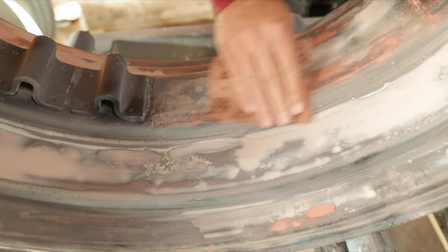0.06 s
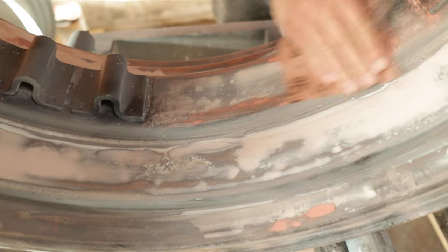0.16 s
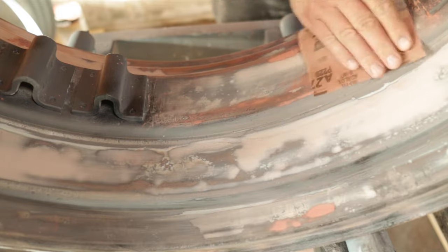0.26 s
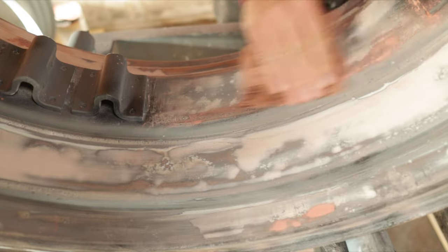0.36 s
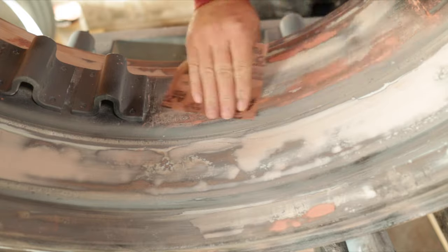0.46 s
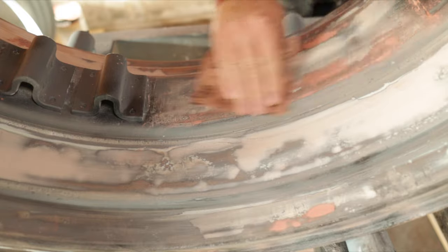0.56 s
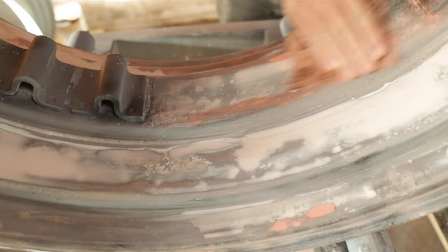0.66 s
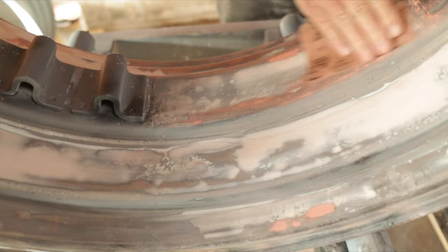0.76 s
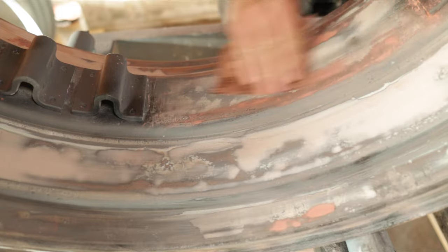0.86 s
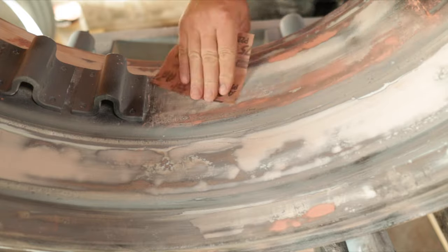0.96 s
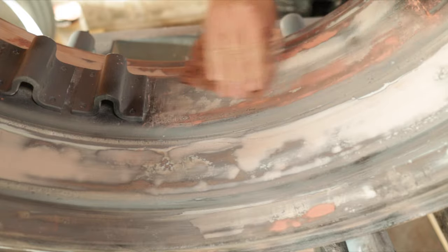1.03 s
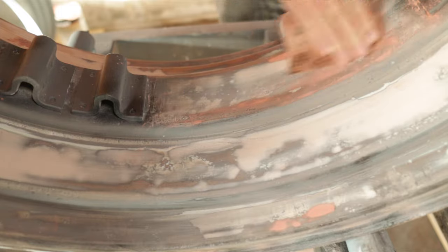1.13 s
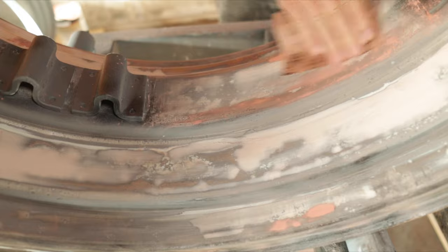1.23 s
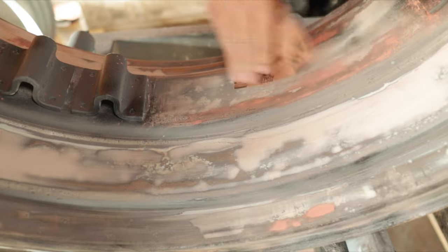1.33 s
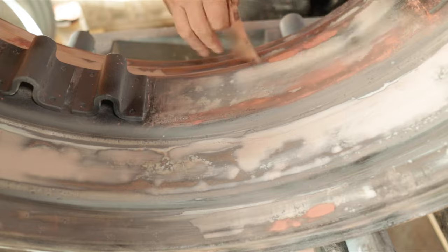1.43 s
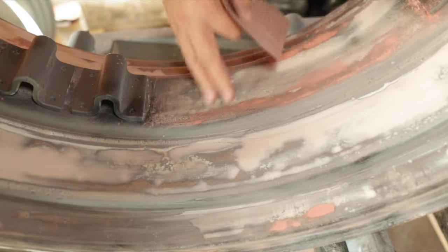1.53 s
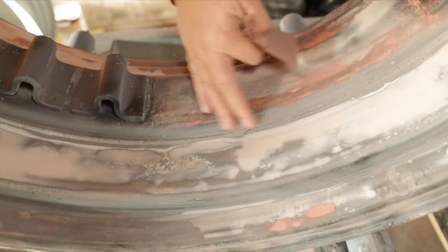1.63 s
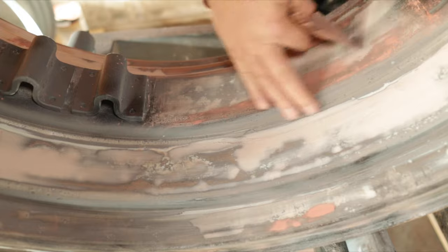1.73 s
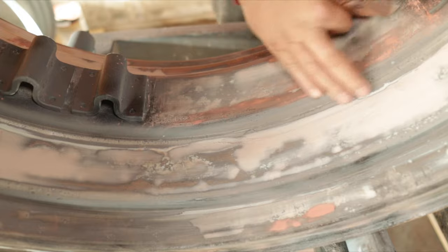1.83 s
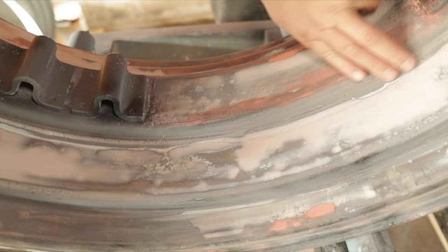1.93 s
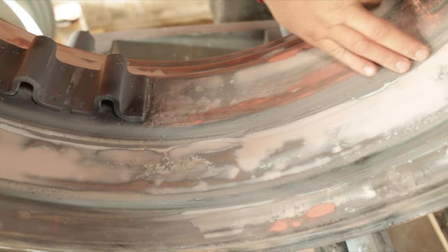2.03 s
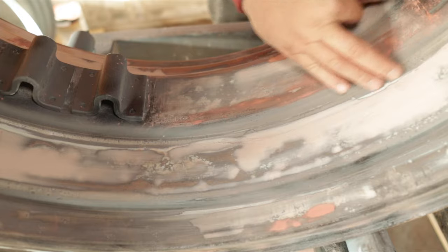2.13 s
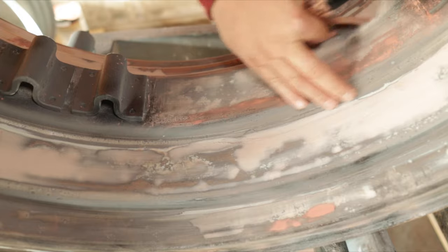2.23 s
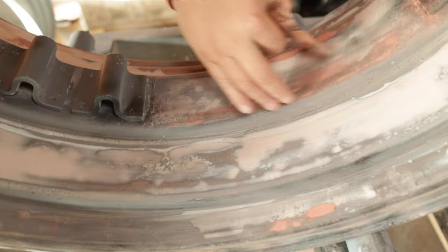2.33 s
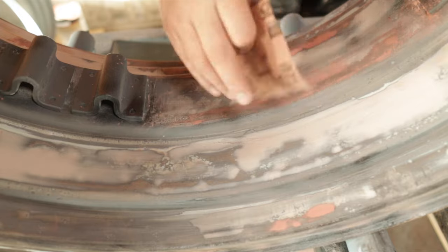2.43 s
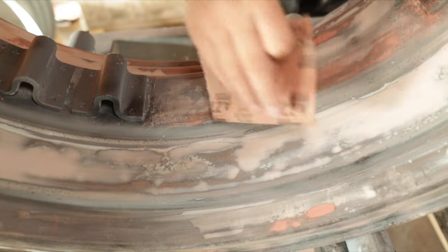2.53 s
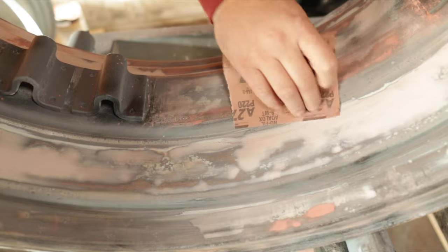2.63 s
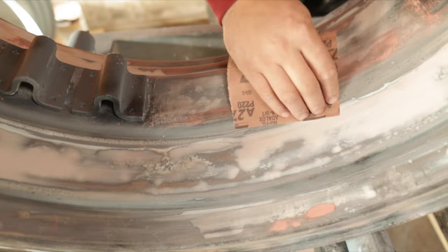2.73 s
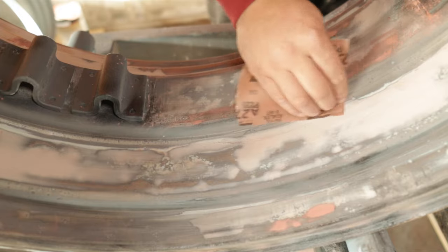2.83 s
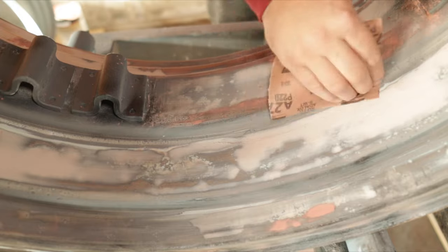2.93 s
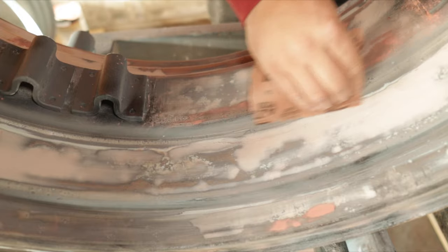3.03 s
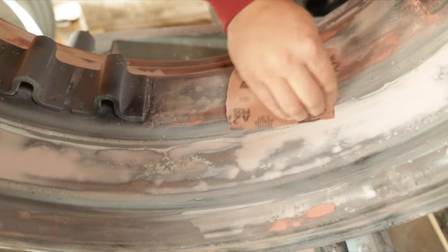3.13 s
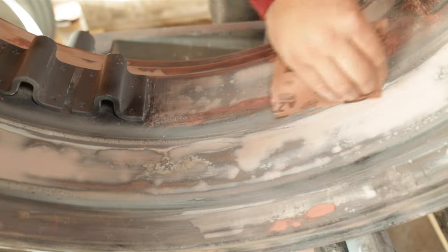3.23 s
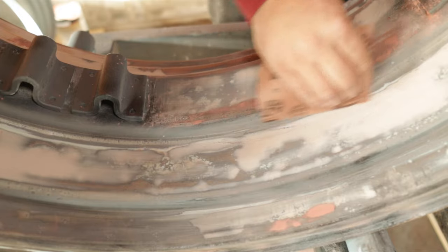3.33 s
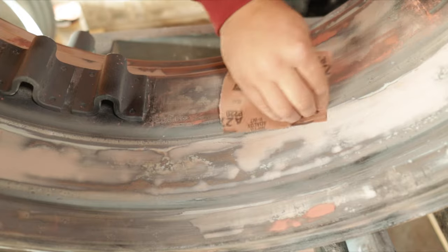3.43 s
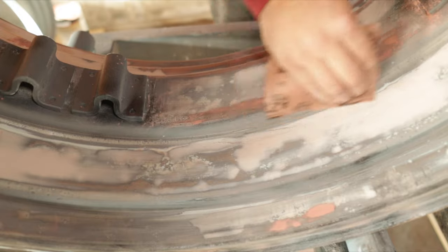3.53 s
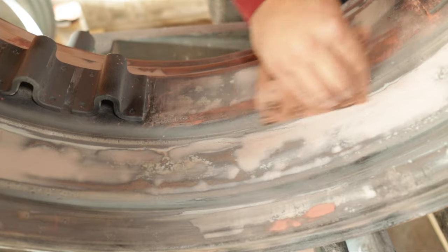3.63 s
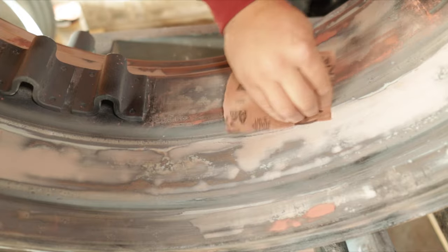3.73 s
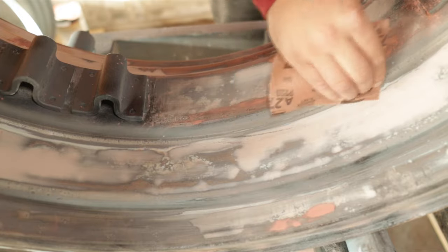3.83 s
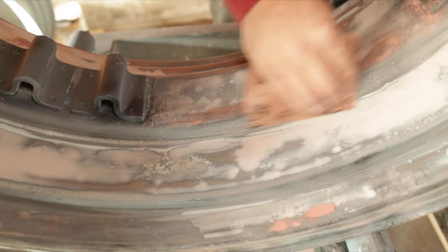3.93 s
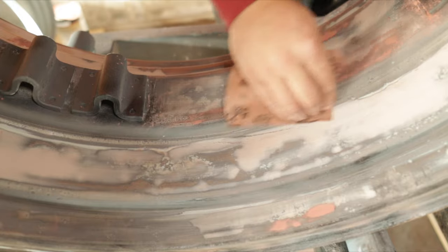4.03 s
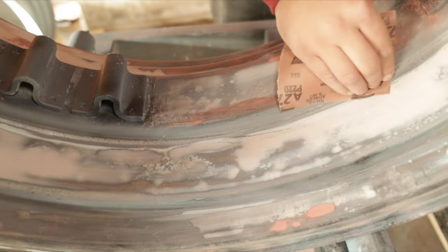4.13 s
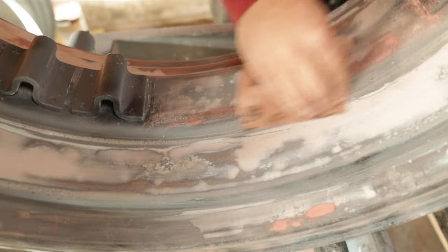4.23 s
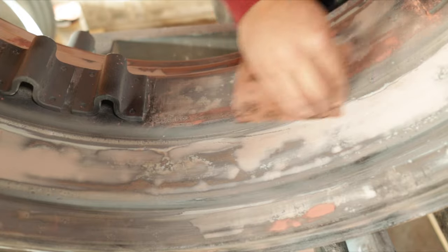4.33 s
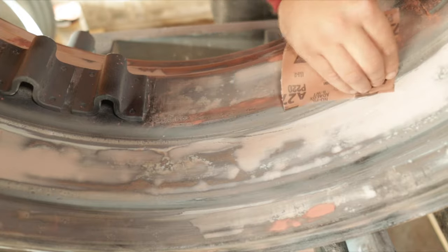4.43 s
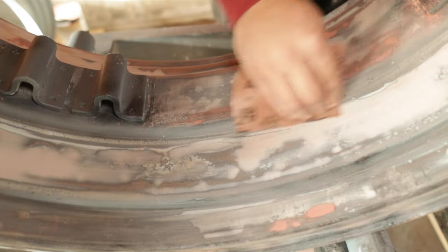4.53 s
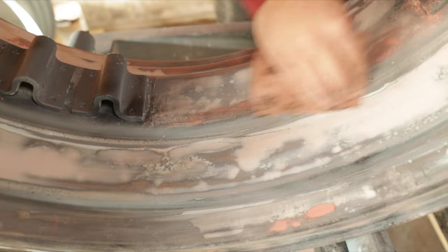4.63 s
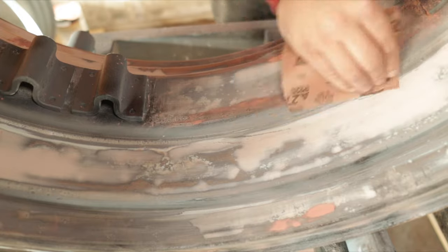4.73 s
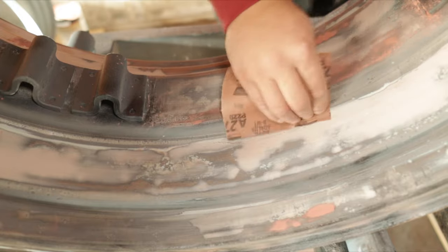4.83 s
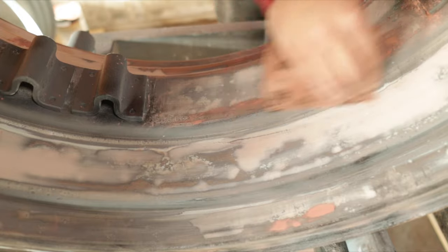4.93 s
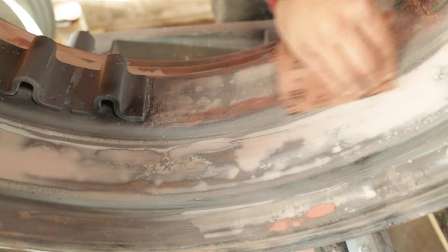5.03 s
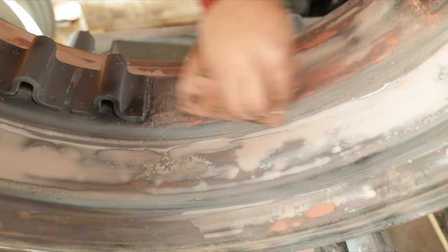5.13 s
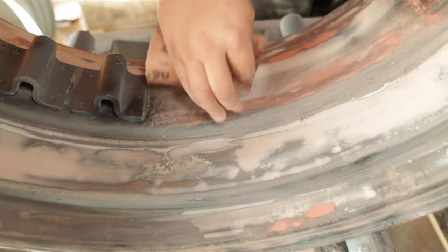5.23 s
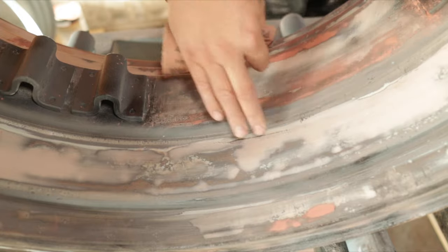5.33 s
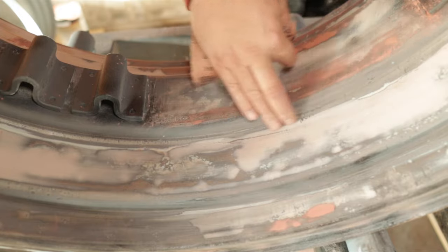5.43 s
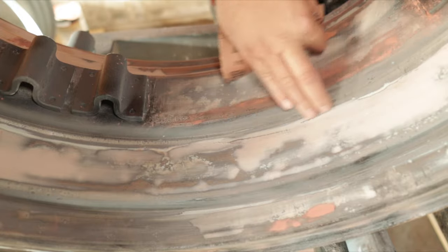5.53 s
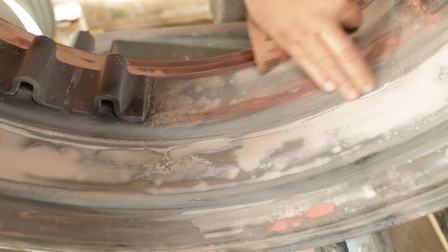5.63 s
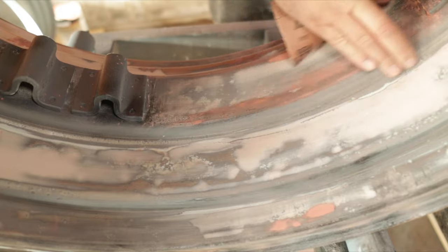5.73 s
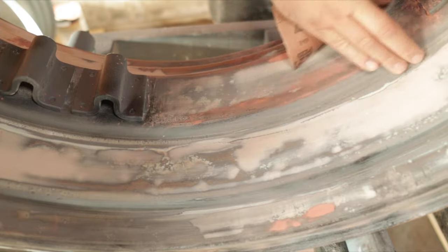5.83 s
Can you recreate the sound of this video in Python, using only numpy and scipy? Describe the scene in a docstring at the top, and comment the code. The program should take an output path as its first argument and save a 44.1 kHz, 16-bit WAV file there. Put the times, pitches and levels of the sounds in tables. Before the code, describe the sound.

Close, dry sandpaper hiss sweeps to and fro over a steel wheel rim, about four long strokes a second. It stops; fingers brush faintly and tap, with sharp knocks on hollow metal. Then short, hard strokes scrub nearly twice as fast, with more metallic scrape, until they end and near-quiet returns. A low workshop rumble and soft echo sit behind. One close microphone, centred.

```python
"""Sandpaper is rubbed by hand to and fro over a primed steel wheel rim: long light strokes, then short hard ones.
Its grit is random tiny clicks, heard as hiss and also shaking the rim, whose modes are ringing filters.
Between the spells fingers wipe (faint grit) and tap (a push, a crack and ringing) as the paper is laid down again.
A knock leaves the wheel humming as two beating modes; shaped noise makes the workshop's rumble and echo.
One microphone hears it all, both channels alike."""
import sys
import numpy as np
from scipy import signal
from scipy.fft import rfft, irfft
from scipy.io import wavfile

SR = 44100
rng = np.random.default_rng(int(sys.argv[2]) if len(sys.argv) > 2 else 0)


def store_pcm(level_fs):
    """Save levels as 16-bit WAV."""
    pcm = np.round(np.clip(level_fs, -1, 1) * 32767).astype(np.int16)
    wavfile.write(sys.argv[1], SR, np.atleast_2d(pcm).T)


def ratio_of_db(decibels):
    """Turn decibels (scalar or array-like) into linear amplitude factors; 0 dB maps to 1."""
    return 10 ** (np.asarray(decibels, float) / 20)


N = 258867   # length in samples

# Strokes of the paper. Each row: start in seconds, end in seconds, hiss level in dB,
# swell over the stroke in dB, ring of the rim's cavity in dB against the hiss.
PAPER_STROKES = [(-0.05, 0.057, -20.5, 0, -3.5), (0.061, 0.365, -16, 5.5, -7), (0.367, 0.618, -15, 4, -7.5),
                 (0.621, 0.866, -16, 0.5, -8.5), (0.839, 1.112, -18, -0.5, -9),
                 (1.076, 1.315, -21, 5.5, -6.5), (1.304, 1.462, -18.5, 7.5, -7.5),
                 (2.923, 3.055, -17, 10, -1.5), (3.092, 3.235, -16.5, 2.5, 2.5),
                 (3.257, 3.383, -16.5, 1.5, -1.5), (3.395, 3.548, -16.5, 2, -0.5),
                 (3.563, 3.693, -17.5, 5.5, -2), (3.705, 3.841, -17, 4, 2.5),
                 (3.858, 3.978, -18.5, 1.5, -2), (3.985, 4.129, -17.5, 3, 1),
                 (4.136, 4.265, -18.5, 0.5, -1), (4.269, 4.412, -17.5, 9, -0.5),
                 (4.419, 4.549, -18.5, 3, -1), (4.551, 4.692, -18, 11, -1.5), (4.707, 4.83, -17.5, 0, -3.5),
                 (4.836, 4.976, -17, 7, -3), (4.992, 5.122, -17.5, 1.5, -3.5), (5.117, 5.301, -19, -4, -5)]
# Fingers and loose paper brushing the rim. Each row: start in seconds, end in seconds, hiss level in dB,
# cavity ring in dB against the hiss, rim body in dB against the hiss.
FINGER_WIPES = [(1.463, 1.54, -26.5, 1.5, -6), (1.67, 1.84, -44.5, 10, 10.5), (1.786, 1.86, -33.5, 3, -20),
                (1.779, 1.98, -38.5, 6.5, 4.5), (1.936, 2, -33.5, -10, -20), (1.97, 2.22, -39.5, 5, 1),
                (2.006, 2.036, -29, -3, -22), (2.05, 2.125, -37.5, 6, 3), (2.13, 2.254, -42.5, 5.5, 1),
                (2.173, 2.19, -32, 0, -20), (2.18, 3.06, -48, -14, -12), (2.46, 2.628, -42.5, 11.5, -9),
                (2.704, 2.78, -28.5, 6, 3), (2.761, 3.1, -51, 9, 20), (2.822, 3.7, -41, -8, -20),
                (2.904, 3.026, -39, 15, 24.5), (5.26, 5.54, -48, -11, 4.5), (5.47, 6.3, -48, -13.5, -31)]
# Fingers and paper edge touching down. Each row: time in seconds, level in dB, centre frequency in Hz.
TOUCHES = [(1.438, -7, 436), (1.45, -5, 440), (1.468, -4.5, 2310), (1.479, -10, 360), (1.687, -17.5, 630),
           (1.699, -23, 700), (1.712, -20.5, 690), (1.789, -16, 2200), (1.92, 1, 696), (1.938, -9, 420),
           (1.943, -20, 345), (1.982, -3.5, 931), (1.995, -14, 930), (2.007, -11.5, 590), (2.066, -16, 931),
           (2.082, -16, 675), (2.099, -17, 617), (2.139, -28, 548), (2.176, -11, 1760), (2.471, -20.5, 787),
           (2.583, -29, 382), (2.639, -14.5, 460), (2.699, -22, 358), (2.72, 2.5, 2160), (2.733, 0.5, 516),
           (2.752, -9, 540), (3.999, -1.5, 2870), (5.665, -33.5, 2520)]
# Damped modes of the rim. Each row: frequency in Hz, relative strength in dB,
# time to die by 60 dB in seconds.
RIM_MODES = [(114, -3, .25), (197, -11, 0.29), (376.6, -11.5, 0.067), (450, 6, 0.0056), (698, 2.5, 0.013),
             (720, -4.5, 0.025), (928, 16, 0.0051), (1070, -8, 0.0055), (1220, 21.5, 0.003),
             (1514, 16, 0.0036), (1644, -1, 0.0098), (2282, 5, 0.0078), (2404, -0.5, 0.027),
             (2617, 9, 0.0048), (3000, -3, 0.021), (3420, 5.5, 0.0031)]
# Colour of the grit's own hiss. Each row: frequency in Hz, relative level per Hz in dB.
HISS_COLOUR = [(150, -14), (1000, -10), (1900, -2.5), (2800, 0), (4500, 2.5), (6300, 6), (9000, 3.5),
               (12000, 3), (14500, -1.5), (16000, -2)]
# Colour of the workshop's rumble. Each row: frequency in Hz, relative level per Hz in dB.
SHOP_COLOUR = [(25, -18), (70, 0.), (120, -1.5), (300, -2), (1000, -8.5), (2500, -6), (4000, -19),
               (12000, -13), (16000, -42)]
# How long the echo lasts. Each row: frequency in Hz, time to die by 60 dB in seconds.
ECHO_T60 = [(200, 0.84), (1500, 0.62), (5000, 0.51), (15000, 0.31)]


def rms_one(x):
    """Scale to an rms (average strength) of 1."""
    return x / np.sqrt(np.mean(x ** 2) + 1e-20)


def at_hz(points, hz):
    """Read the second column of a table at a frequency, on a log frequency axis."""
    table = np.array(points)
    return np.interp(np.log(hz), np.log(table[:, 0]), table[:, 1])


def drift(rate_hz):
    """Slow random wandering of spread 1: noise smoothed by two poles at rate_hz."""
    step = 40   # samples between computed points
    pole = np.exp(-2 * np.pi * rate_hz * step / SR)
    noise = rng.standard_normal(N // step + 2002)
    slow = signal.lfilter([1], [1, -2 * pole, pole * pole], noise)[2000:]   # drop the filter's start
    return np.interp(np.arange(N) / step, np.arange(len(slow)), rms_one(slow))


def ring(force, hz, t60_s):
    """A damped mode: a unit click sets a dying sine of height 1 ringing."""
    decay = ratio_of_db(-60 / (t60_s * SR))
    turn = 2 * np.pi * hz / SR
    return signal.lfilter([0, np.sin(turn)], [1, -2 * decay * np.cos(turn), decay * decay], force + 1e-18)


def bands(x, low_hz, count):
    """Cut x into overlapping half-octave slices that add up to x again between the end slices."""
    spectrum = rfft(x)
    place = 2 * np.log2(np.fft.rfftfreq(len(x), 1 / SR) / low_hz + 1e-9)
    for k in range(count):
        share = np.clip(1 - np.abs(place - k), 0, 1)
        yield low_hz * 2 ** (k / 2), irfft(spectrum * share, len(x))


def grit(per_s, spread_db):
    """Grains catch and let go at random, a few much harder than the rest; equally strong at any rate."""
    sizes = ratio_of_db(spread_db * np.minimum(rng.exponential(1, N), 5)) * rng.standard_normal(N)
    caught = rng.random(N) < per_s / SR
    return rms_one(sizes * caught / np.sqrt(per_s))


def strokes(bite):
    """The paper breaks loose, slides and stops at every turn: gains of hiss, cavity and body (speed ** bite)."""
    start_share, stop_share = 0.15, 0.15   # of a stroke's length spent speeding up and slowing down
    arch_db = 4   # the hand is fastest mid-stroke: the hiss is this much weaker at both ends
    # The steel is shaken hardest as the paper breaks loose: loss over a stroke.
    ring_fades_db, body_fades_db = 3, 6
    # Body against hiss in a firm stroke, and the cavity ring that counts as firm.
    firm_body_db, firm_ring_db = -3.5, -3
    # dB of body per dB of ring: below firm it drops fast, above firm it grows a little.
    slope_below, slope_above = 2.98, 0.57
    body_sag_db = 3.5   # the body is weakest mid-stroke
    t = np.arange(N) / SR
    power = np.full((3, N), 1e-12)
    for start, end, hiss_db, swell_db, ring_db in PAPER_STROKES:
        done = np.clip((t - start) / (end - start), 0, 1)
        speed = np.minimum(done / start_share, 1) * np.minimum((1 - done) / stop_share, 1)
        slope = slope_below if ring_db < firm_ring_db else slope_above
        body_db = firm_body_db + (ring_db - firm_ring_db) * slope
        hiss_part_db = -arch_db * (2 * done - 1) ** 2
        cavity_part_db = ring_db - ring_fades_db * (done - 0.5)
        sag_db = body_sag_db * (np.sin(np.pi * done) - 0.5)
        body_part_db = body_db - body_fades_db * (done - 0.5) - sag_db
        parts_db = np.array([hiss_part_db, cavity_part_db, body_part_db])
        power += (speed ** bite * ratio_of_db(hiss_db + swell_db * (done - 0.5) + parts_db)) ** 2
    return np.sqrt(power)


def rubbing():
    """Grit hisses in the air and drives the rim's modes; uneven primer makes each part flicker."""
    brushed = wipes()
    gain = np.hypot(strokes(bite=1.3)[0], brushed[0])
    paper = np.minimum(strokes(bite=2.8)[0], gain)
    _, ring_gain, body_gain = np.hypot(strokes(bite=0.62), brushed)   # the steel shakes even at low speed

    # Treble tilt in dB per octave: faster paper is brighter; a fingertip has a thin, bright hiss of its own.
    paper_share = paper / gain
    paper_tilt_db = 0.39 * np.clip(20 * np.log10(paper) + 18, -14, 6)
    tilt_db = paper_tilt_db * paper_share + 1.36 * (1 - paper_share)

    caught = np.clip(gain / 0.04, 0.25, 1)   # a light wipe catches few grains and crackles
    hiss = 0
    for hz, part in bands(grit(per_s=20000 * caught, spread_db=0.5), 117, count=15):
        flicker_db = 0.74 * drift(18.0)
        octaves_up = max(np.log2(hz / 3500), 0)
        hiss = hiss + part * ratio_of_db(at_hz(HISS_COLOUR, hz) + tilt_db * octaves_up + flicker_db)

    coarse = grit(per_s=8000 * caught, spread_db=1.5)   # the larger grains shake the steel
    modes = []
    for k, (hz, db, t60_s) in enumerate(RIM_MODES):
        strength = (-1) ** k * ratio_of_db(db + 1.85 * drift(4.5))
        modes.append((hz, strength * ring(coarse, hz, t60_s)))
    body_below_hz = 1600
    # Grit is too fine to move the two slowest modes in the body.
    body = rms_one(sum(mode for hz, mode in modes[2:] if hz < body_below_hz))
    cavity = rms_one(sum(mode for hz, mode in modes if hz > body_below_hz))
    body_shake = body_gain * ratio_of_db(1.0 * drift(46)) * body
    cavity_shake = ring_gain * ratio_of_db(1.66 * drift(22)) * cavity
    return gain * rms_one(hiss) + body_shake + cavity_shake


def channel(x, above_hz):
    """The narrow rim radiates little bass, and the echo off its far wall weakens one band."""
    x = signal.sosfilt(signal.butter(2, above_hz, "high", fs=SR, output="sos"), x)
    weakened_band = signal.lfilter(*signal.iirpeak(1800, 3.0, fs=SR), x)   # centre in Hz, sharpness
    return x - 0.44 * weakened_band


def room(x):
    """Diffuse echo of the workshop: noise that dies faster in the treble."""
    t = np.arange(SR * 3 // 4) / SR
    parts = bands(rng.standard_normal(len(t)), 142, count=15)
    echo = sum(part * ratio_of_db(-60 * t / at_hz(ECHO_T60, hz)) for hz, part in parts)
    echo = echo * np.clip(t / 0.023, 0, 1)   # builds up over 23 ms
    echo = echo / np.sqrt(np.sum(echo ** 2))
    return ratio_of_db(-12) * signal.fftconvolve(x, echo)[:N]


def shop_air():
    """Steady rumble of the workshop: noise coloured slice by slice."""
    parts = bands(rng.standard_normal(N), 26.0, count=20)
    rumble = sum(part * ratio_of_db(at_hz(SHOP_COLOUR, hz)) for hz, part in parts)
    return ratio_of_db(-45.5) * rms_one(rumble)


def taps():
    """Each touch is a short push, a crack, and a ragged press that rings the modes, most those near its centre."""
    s, level_db, centre_hz = np.transpose(TOUCHES)
    out = np.zeros(N + SR)
    after = np.arange(SR // 20) / SR   # seconds since the touch
    noise = rng.standard_normal((len(s), 2, len(after)))
    chance_db = rng.normal(0, 5.4, (len(s), len(RIM_MODES)))
    crack_band = signal.butter(2, [1700, 5000], "band", fs=SR, output="sos")
    mode_hz, mode_db, _ = np.transpose(RIM_MODES)
    for k, at in enumerate(((s + 0.001516) * SR).astype(int)):
        push = np.sin(2 * np.pi * centre_hz[k] * after) * np.exp(-after * centre_hz[k])
        press = np.pad(noise[k, 0] * np.exp(-after / 0.0059), (0, SR // 4))
        octaves = np.log2(mode_hz / centre_hz[k])
        # Modes lose 2.5 dB per octave above the centre and 12 below it.
        near_db = mode_db - np.where(octaves > 0, 2.5, -12) * octaves
        rings = 0
        for m, (hz, _, t60_s) in enumerate(RIM_MODES):
            rings = rings + (-1) ** m * ratio_of_db(near_db[m] + chance_db[k, m]) * ring(press, hz, t60_s)
        crack_db = -9 + 1.3 * np.log2(centre_hz[k] / 1000)   # harder, higher-pitched touches crack more
        crack = signal.sosfilt(crack_band, noise[k, 1]) * np.exp(-after / 0.0015) * ratio_of_db(crack_db)
        out[at:at + len(after)] += ratio_of_db(level_db[k]) * (1.03 * push + crack)
        out[at:at + len(press)] += ratio_of_db(level_db[k] - 2) * rings / np.max(np.abs(rings))
    return out[:N]


def wipes():
    """A brush swells quickly and trails off: gains of hiss, cavity and body."""
    rise_share, fall_power = 0.3, 1.23   # share of the wipe spent rising, curve of the fall
    t = np.arange(N) / SR
    power = np.full((3, N), 1e-12)
    for start, end, hiss_db, ring_db, body_db in FINGER_WIPES:
        done = np.clip((t - start) / (end - start), 0, 1)
        fall = ((1 - done) / (1 - rise_share)) ** fall_power
        shape = np.minimum(done / rise_share, fall)
        power += (shape * ratio_of_db(hiss_db + np.array([[0], [ring_db], [body_db]]))) ** 2
    return np.sqrt(power)


def wheel_hum():
    """A knock sets the wheel's two lowest modes going against each other, so the hum swells and sinks."""
    knock_s, middle_hz, split_hz = 1.665, 71.3, 3.23   # the two modes lie split_hz apart
    level_db, t60_s = -40.5, 6.8
    t = np.maximum(np.arange(N) / SR - knock_s, 0)   # held at 0, so silent, before the knock
    beat = np.sin(np.pi * split_hz * t) * np.sin(2 * np.pi * middle_hz * t)
    return np.sqrt(2) * ratio_of_db(level_db - 60 * t / t60_s) * beat


def scene():
    """Everything reaches one microphone; a tap moves the whole wheel and so reaches lower."""
    rim = channel(rubbing(), above_hz=290) + channel(taps(), above_hz=184)
    mono = rim + room(rim) + wheel_hum() + shop_air()
    return np.array([mono, mono])


def low_pass(x):
    """Removes everything above the highest recorded frequency."""
    return signal.sosfilt(signal.butter(12, 16160, fs=SR, output="sos"), x)


def record(dry):
    """Peaks are rounded near full scale, then the top is cut at 16.2 kHz."""
    rounded = 1.2 * np.tanh(dry / 1.2)
    top_cut = signal.cheby2(12, 60, 16200, fs=SR, output="sos")   # 60 dB down from 16200 Hz up
    return low_pass(signal.sosfilt(top_cut, rounded))


dry = scene()
out = record(dry)
store_pcm(out)
```